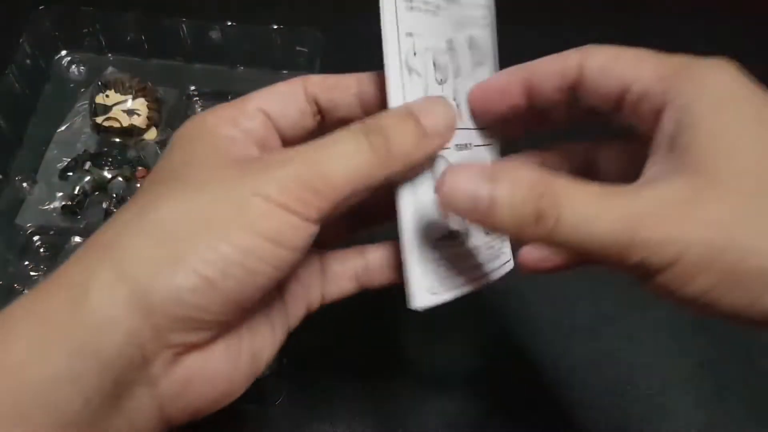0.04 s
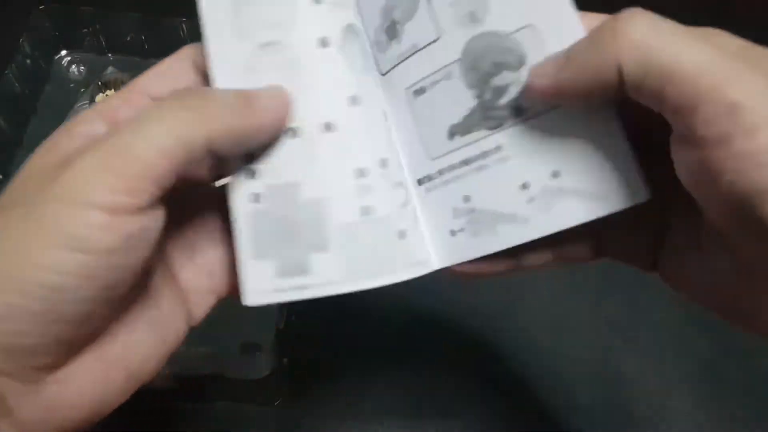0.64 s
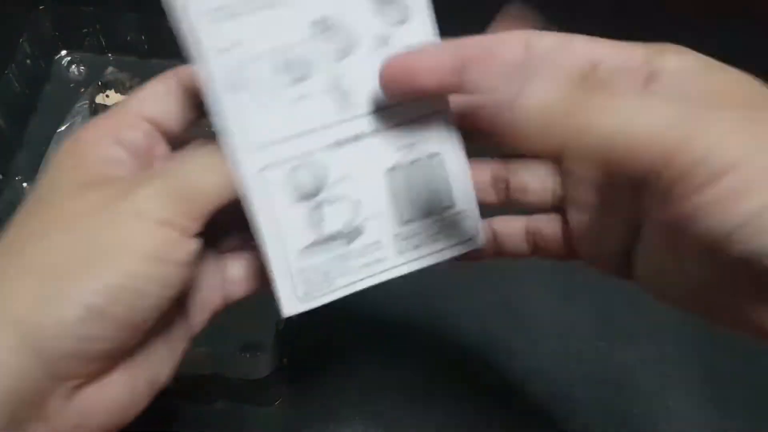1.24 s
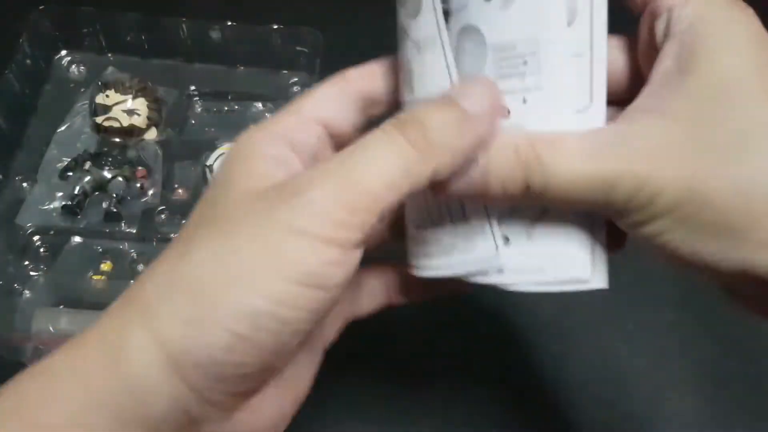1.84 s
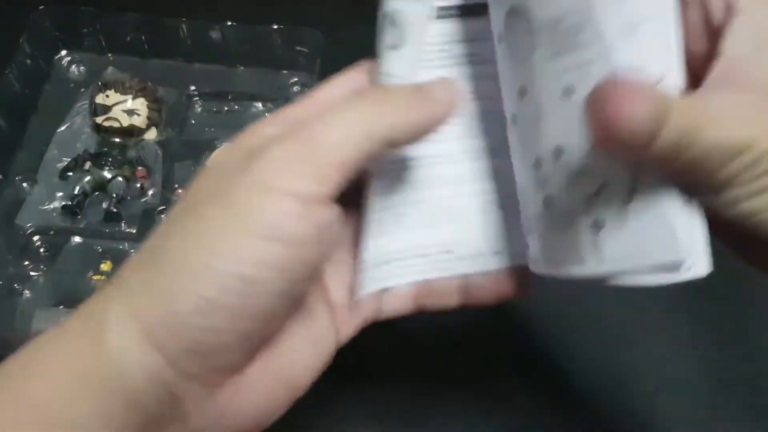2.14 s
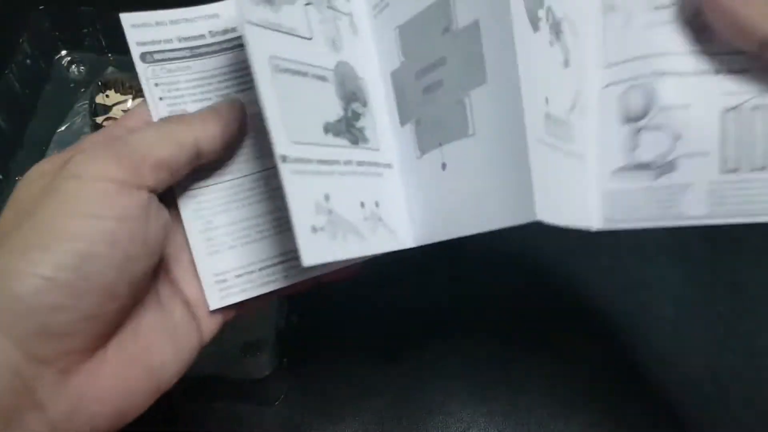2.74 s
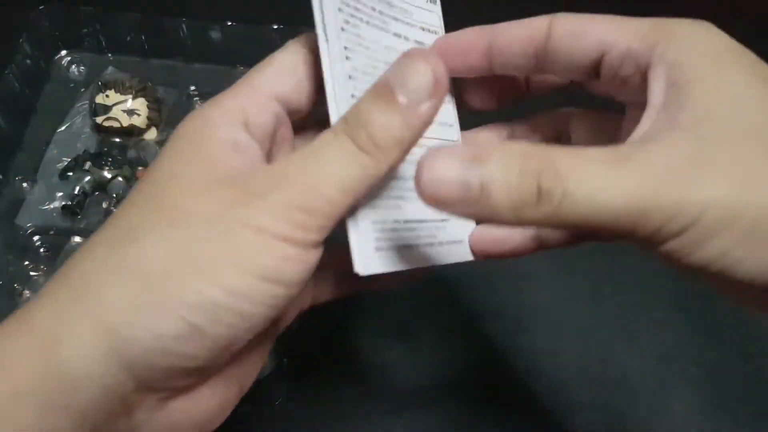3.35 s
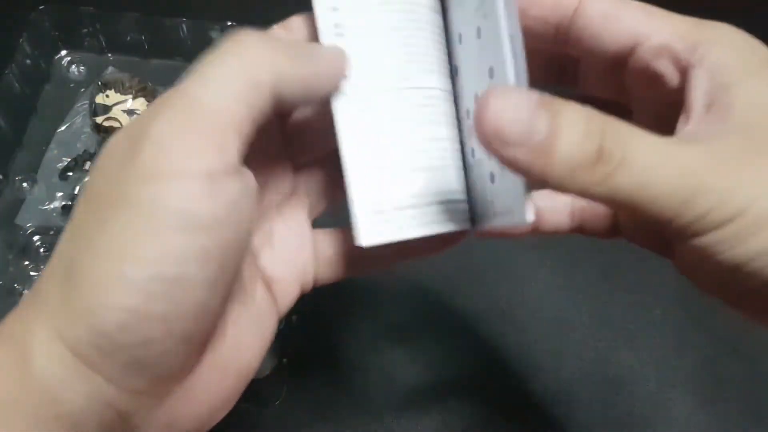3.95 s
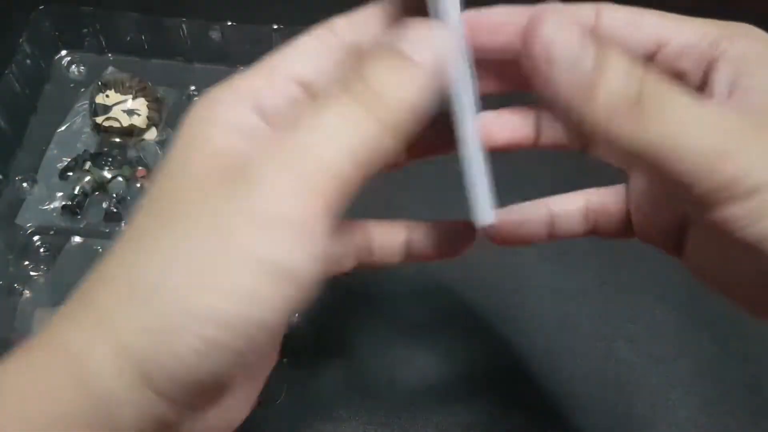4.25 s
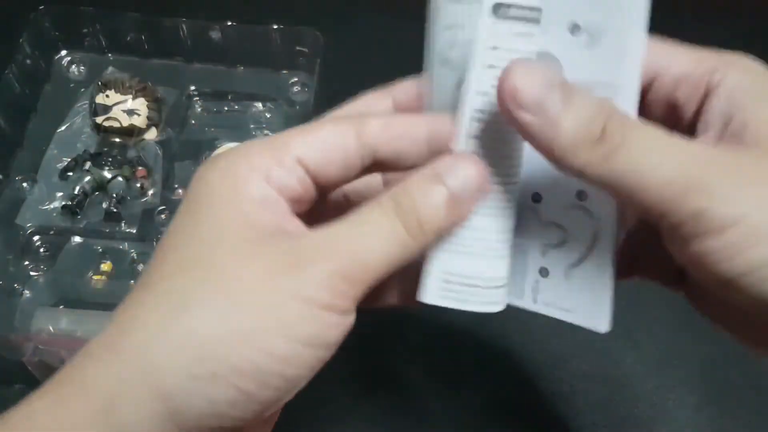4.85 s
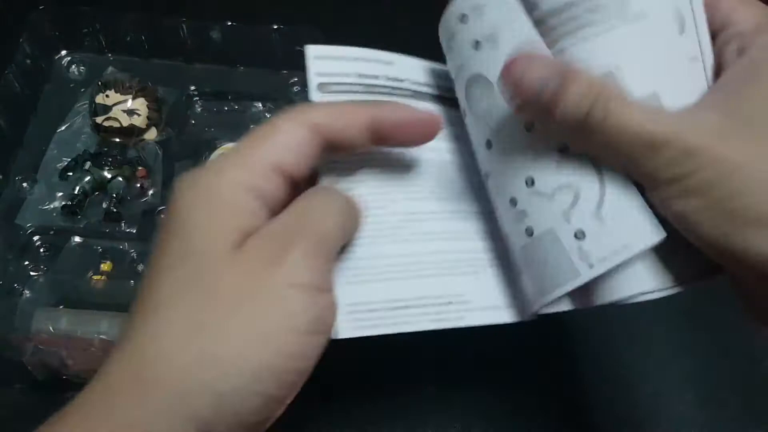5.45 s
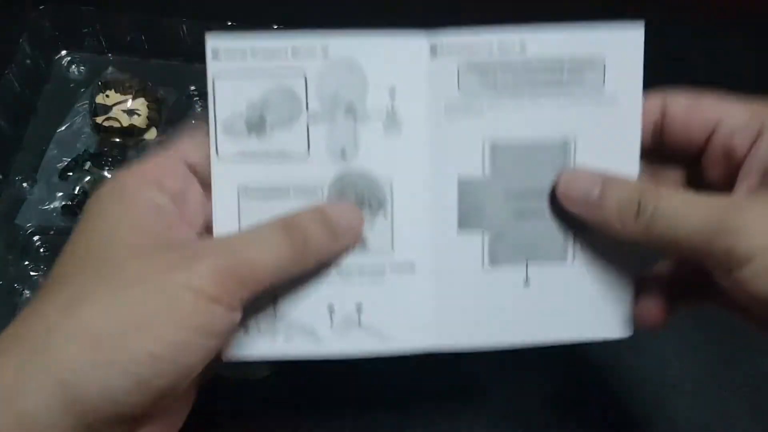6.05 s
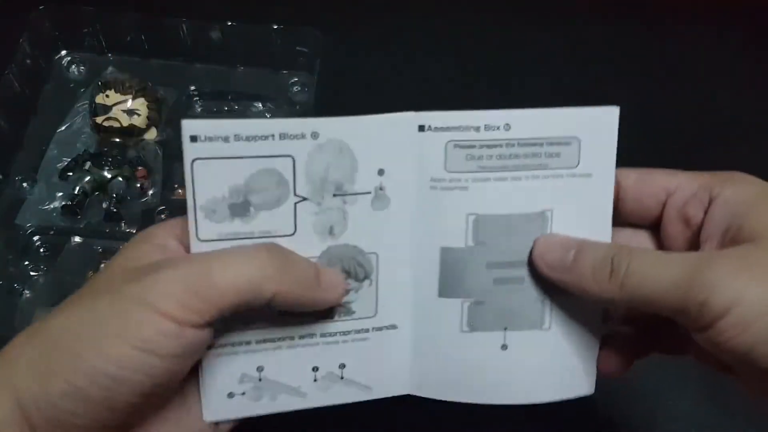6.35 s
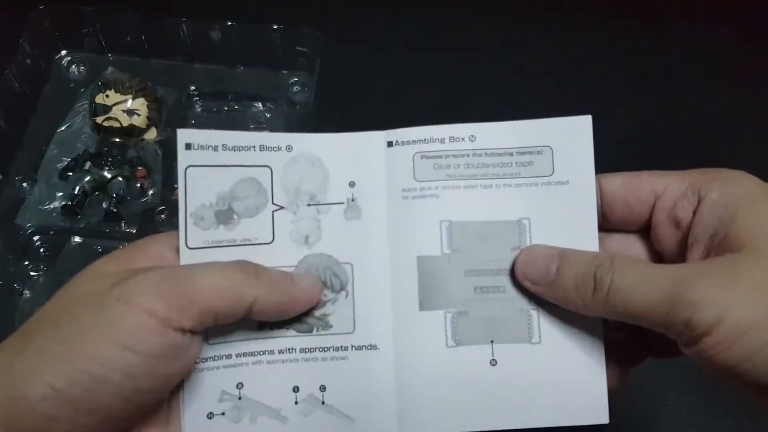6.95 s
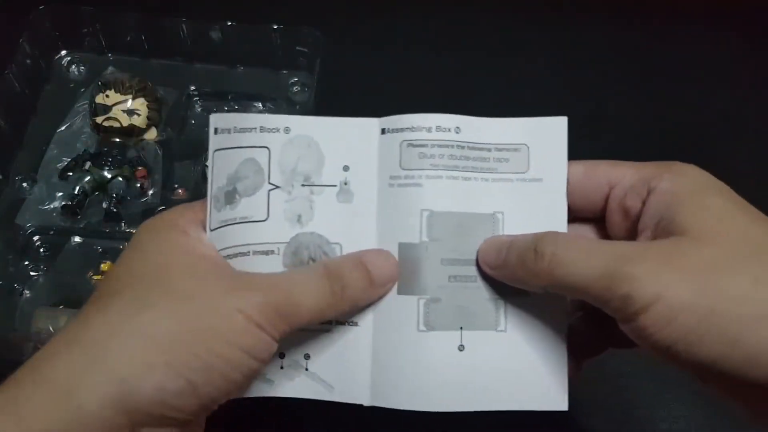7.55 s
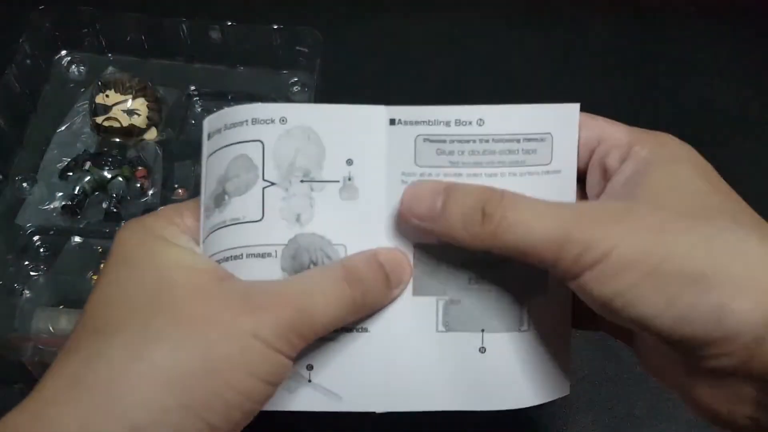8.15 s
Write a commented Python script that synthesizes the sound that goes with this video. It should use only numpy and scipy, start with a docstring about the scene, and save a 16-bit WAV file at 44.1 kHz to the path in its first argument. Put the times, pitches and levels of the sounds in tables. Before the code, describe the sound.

Two hands unfold, turn and refold a paper leaflet close to a stereo microphone in a small room. Soft sliding and small crease ticks grow into a louder rustle, and a panel buckles with a crisp crackle. After gentler handling, a second burst of rustling ends in another crackle, then fades to light rubs and taps. A low rumble, faint hum and distant engine lie underneath.

```python
"""Paper leaflet, close up in a small room

Two hands unfold, turn and refold a leaflet right in front of a stereo pair of microphones.
Leaves scrape and hiss over each other and under the fingers, creases tick as they snap over,
and twice a panel buckles with a loud crackle. Well behind the paper sit room rumble,
a faint mains hum, a low drone and a distant engine that slowly runs down."""
import sys
import numpy as np
from scipy import signal
from scipy.fft import rfft, irfft, next_fast_len
from scipy.io import wavfile
from scipy.ndimage import uniform_filter1d, map_coordinates

SR = 44100
rng = np.random.default_rng(int(sys.argv[2]) if len(sys.argv) > 2 else 0)


def to_wav(s):
    """Save 16-bit WAV."""
    ch = np.atleast_2d(s).T  # columns
    pcm = np.round(np.clip(ch, -1, 1) * 32767)  # PCM
    wavfile.write(sys.argv[1], SR, pcm.astype(np.int16))


N = 361179


def sliding(scrape_gain_db=1, hiss_gain_db=1.5, flutter_db=0.76, crinkle_db=-53.5, free_slide_db=-49):
    """Pressed paper scrapes and crinkles, gliding paper hisses; the grip flutters scrape and hiss."""
    # spectra of pressed and of gliding paper at the microphones: f/Hz, level/dB
    scrape_colour = [(150, -23.5), (400, -25), (700, -2), (1300, -6.5), (1800, 6.5), (2250, 10.5),
                     (2700, 6), (4200, 6), (6500, 5), (8500, -5.5), (12000, 0.5), (16000, -24)]
    hiss_colour = [(3000, -23.5), (7000, -5.5), (8700, -12.5), (11000, -3.5), (13000, -0.5), (15500, -0.5),
                   (17000, 1.5)]
    crinkle_colour = [(400, 1), (1200, 7), (2600, -2), (6000, -7), (8500, -14), (14000, -1.5)]
    scrape_db, hiss_db = hand_effort()
    grip_db = flutter_db * wobble(70)
    scrape = swirling(coloured(friction(rate=800, clump_db=2.7), scrape_colour), depth_db=4.2)
    hiss = swirling(coloured(friction(rate=2000, clump_db=-0.5), hiss_colour), depth_db=3.3)
    crinkle = coloured(crinkles(rate=70, spread_db=5, life=0.0005), crinkle_colour)
    # crinkles stop growing once the leaves slide freely, so they stand out in gentle handling
    effort_db = 0.97 * np.minimum(scrape_db - free_slide_db, 0)
    return (amp(scrape_db + scrape_gain_db + grip_db) * scrape
            + amp(hiss_db + hiss_gain_db + grip_db) * hiss
            + amp(crinkle_db + effort_db) * crinkle)


def hand_effort(rub_hiss_db=3.5):
    """Scrape and hiss levels in dB: single strokes on top of the soft rubbing of the hands."""
    # rubbing between strokes: t/s, level/dB
    rubbing = [(0, -79), (.5, -71.5), (1.1, -69), (1.32, -78), (1.6, -57), (2.5, -58.5), (3.1, -61),
               (3.3, -80), (4.0, -74), (4.8, -69.5), (5.0, -58.5), (5.07, -62.5), (5.7, -51), (6.25, -69.5),
               (6.75, -72.5), (7.35, -75.5), (7.55, -83), (7.8, -86), (8.0, -71.5), (8.19, -70)]
    # strokes of paper over paper or skin: t/s, length/s, scrape/dB, hiss/dB
    strokes = [(0.042, 0.073, -66.5, -55), (0.144, 0.1, -70, -60), (0.298, 0.018, -59.5, -51),
               (0.359, 0.024, -60, -59), (0.592, 0.12, -56, -67), (0.69, 0.055, -56.5, -51),
               (0.78, 0.032, -69, -53), (0.84, 0.09, -56.5, -51.5), (1.095, 0.081, -67, -57.5),
               (1.163, 0.048, -64, -47), (1.323, 0.094, -64, -59.5), (1.436, 0.12, -60.5, -52),
               (1.544, 0.054, -43.5, -34.5), (1.607, 0.056, -47.5, -47), (1.645, 0.019, -43, -38),
               (1.663, 0.056, -41.5, -32.5), (1.723, 0.071, -45.5, -42.5), (1.759, 0.11, -45.5, -38.5),
               (1.92, 0.17, -51.5, -67), (2.141, 0.039, -51.5, -51), (2.26, 0.067, -51.5, -59.5),
               (2.314, 0.027, -44, -37.5), (2.395, 0.076, -49, -58.5), (2.522, 0.12, -53.5, -51),
               (2.818, 0.066, -53.5, -53), (3.132, 0.058, -56.5, -50.5), (3.267, 0.075, -69.5, -61),
               (3.54, 0.077, -85, -58.5), (3.76, 0.071, -73, -58.5), (4.069, 0.073, -69.5, -55),
               (4.119, 0.042, -54.5, -48.5), (4.187, 0.036, -57.5, -49), (4.31, 0.18, -80, -60),
               (4.49, 0.026, -59.5, -53.5), (4.571, 0.034, -64.5, -53), (4.639, 0.073, -66, -53.5),
               (4.82, 0.051, -60, -49), (4.92, 0.03, -48, -43.5), (5.107, 0.079, -59.5, -49.5),
               (5.162, 0.089, -55, -43), (5.24, 0.06, -40.5, -29.5), (5.311, 0.064, -41, -32.5),
               (5.395, 0.23, -50, -46), (5.531, 0.1, -43, -42.5), (5.817, 0.043, -41, -35),
               (5.907, 0.14, -51.5, -43.5), (6.06, 0.076, -61, -47), (6.254, 0.083, -63.5, -54.5),
               (6.372, 0.091, -81, -55.5), (6.577, 0.04, -65, -51), (6.897, 0.07, -62, -61),
               (6.937, 0.065, -59.5, -53), (7.596, 0.042, -63, -57), (7.867, 0.08, -61, -76),
               (7.926, 0.06, -56.5, -57), (8.064, 0.055, -65, -80)]
    power = amp(curves(rubbing)[0] + np.array([[0], [rub_hiss_db]])) ** 2
    for start, length, *levels in strokes:
        add(power, start, np.outer(amp(levels), stroke(length)) ** 2)
    return 10 * np.log10(power)


def stroke(length, attack_s=0.018, release_db_per_s=262):
    """Gain of one stroke: it sets in quickly, holds, then dies away."""
    t = np.arange(SR // 2) / SR
    return np.minimum(t / attack_s, 1) * amp(-release_db_per_s * np.maximum(t - length, 0))


def friction(rate, clump_db):
    """Tiny slips arrive in brief clumps: mid and side noise."""
    return amp(clump_db * wobble(rate)) * rng.standard_normal((2, N))


def swirling(x, depth_db):
    """Random, shifting narrow-band patches give the scrape and hiss a swirling texture."""
    spectra = signal.stft(x, nperseg=1024)[2]
    patches = rng.standard_normal(spectra.shape[1:])
    for axis in (0, 1):  # smooth over frequency, then time
        patches = uniform_filter1d(patches, size=4, axis=axis)
    swirled = signal.istft(spectra * amp(depth_db * unit(patches)), nperseg=1024)[1]
    return unit(swirled[:, :N])


def crinkles(rate, spread_db, life):
    """Tiny cracks of random size in the bending sheet, about rate a second: mid and side."""
    cracks = (rng.random(N) < rate / SR) * amp(spread_db * np.minimum(rng.exponential(size=N), 2))
    envelope = signal.lfilter([1], [1, -np.exp(-1 / (life * SR))], cracks)
    return envelope * rng.standard_normal((2, N))


def buckling(strain_db=-15, crack_db=-15, shiver_db=-26):
    """A panel flips in a few dry jerks, its ring shifting; it strains before each and shivers after."""
    # jerks: t/s, push/dB, body/dB, crisp/dB, edge/dB (four bands, low to high), life/s, ring/Hz
    jerks = [(2.3851, -34, -35.5, -30.5, -30.5, 0.002, 1400), (2.39, -28, -28.5, -37, -38.5, 0.0019, 910),
             (2.3938, -36.5, -28, -29.5, -46, 0.0024, 1200), (2.4005, -37.5, -30, -34.5, -50, 0.0026, 1300),
             (2.4089, -43, -29.5, -45, -47.5, 0.004, 1150), (2.4216, -38, -34, -42, -51.5, 0.012, 1100),
             (5.6235, -24, -27.5, -37.5, -51, 0.0018, 1050), (5.6278, -50, -23, -41, -54, 0.0049, 1950),
             (5.635, -34, -37.5, -33.5, -51.5, 0.0023, 1800), (5.6471, -27.5, -32.5, -34, -40, 0.002, 900),
             (5.6516, -30, -25, -34.5, -45, 0.0008, 1210), (5.6542, -33, -23.5, -30.5, -42, 0.0022, 1800),
             (5.667, -45, -31.5, -40, -45, 0.0033, 1900), (5.679, -41.5, -39, -52, -56, .002, 900)]
    # dry crack of each jerk at the microphones: f/Hz, level/dB
    crack_colour = [(500, -5.5), (2000, 18), (6500, 4.5), (8700, -14.5), (10800, 13.5), (15000, 12)]
    # side signal of a panel close and straight ahead of the microphones: f/Hz, gain/dB
    near_side = [(200, 8), (400, -8.5), (1200, -5), (4000, 1.5)]
    out = np.zeros((2, N))
    for s, *levels, life, ring_hz in jerks:
        def response(hz):
            crack = amp(crack_db + along(crack_colour, hz))
            return (sheet(hz) + crack) * ringing(hz, ring_hz, db=2, q=2.8)

        def panel(drive):
            return voiced(filtered(drive, response), [200, 750, 3000, 8000, 16000], levels)

        strain = jerk(rise=0.0004, life=0.0025)[:, ::-1]  # reversed: swells into the jerk
        padded_strain = np.pad(strain, ((0, 0), (0, SR // 20)))
        add(out, s - strain.shape[1] / SR, amp(strain_db) * panel(padded_strain))
        snap = jerk(rise=0.0004, life=life)
        shiver = amp(shiver_db) * jerk(rise=0.002, life=0.014)
        add(out, s, panel(snap + shiver))
    return np.array([out[0], equalised(out[1], near_side)])


def creases(gain_db=0.5):
    """A crease snaps over within milliseconds and rings the paper beside it."""
    # ticks of creases and edges: t/s, level/dB, treble tilt/dB, ring/Hz, life/s
    ticks = [(0.0442, -59.5, 4, 870, 0.0015), (0.1636, -51.5, 4.5, 5200, 0.0017),
             (0.6052, -47.5, 1.5, 5050, 0.0015), (0.8577, -47, 6.5, 4400, 0.00057),
             (1.3404, -50.5, 3, 950, 0.0011), (1.479, -57.5, -3, 1210, 0.0022),
             (1.778, -34.5, -0.5, 2170, .0026), (1.7852, -36.5, 3.5, 1070, 0.0015),
             (2.0299, -54, -4.5, 2280, .003), (2.1636, -53, -2, 2120, .0026),
             (2.568, -50.5, -7.5, 1090, .0018), (2.83, -41, 0, 6900, 0.0011),
             (3.167, -57, -10, 1300, 0.0065), (4.159, -54.5, -3, 2200, 0.0036),
             (4.833, -58, 6, 4140, .0015), (4.945, -50, 1, 4020, .0028), (5.595, -47, -5, 2200, .002),
             (6.3486, -49, -3, 1220, 0.00085), (6.917, -51, 4.5, 1060, 0.0018),
             (6.9558, -42, 3, 5860, 0.0024), (7.602, -55.5, 6, 5000, 0.0042)]
    # microphone notch near 9 kHz, heard on the ticks: f/Hz, gain/dB
    mic_notch = [(7000, 0), (8700, -6), (11000, -5), (14000, -1)]
    out = np.zeros((2, N))
    for s, db, tilt, ring_hz, life in ticks:
        snap = jerk(life / 4, life)
        rung = filtered(snap, lambda hz: ringing(hz, ring_hz, db=13, q=12))
        crack = voiced(rung, [600, 3000, 8500, 16000], [db - tilt, db, db + tilt])
        add(out, s, equalised(crack, mic_notch))
    return amp(gain_db) * out


def dragging(width_hz=330):
    """A dragged edge sticks and slips hundreds of times a second, each slip ringing the free sheet."""
    # rasps of an edge: t/s, length/s, level/dB, ring/Hz
    drags = [(1.628, 0.06, -45.5, 2350), (5.324, 0.15, -50, 2140), (5.531, 0.07, -53, 2280)]
    out = np.zeros((2, N))
    for start, length, db, ring_hz in drags:
        pressure = amp(db) * stroke(length)
        slips = crinkles(rate=900, spread_db=3, life=0.00003)[:, :len(pressure)]
        rasp = filtered(slips, lambda hz: resonance(hz, ring_hz, width_hz) ** 2)
        add(out, start, pressure * unit(rasp))
    return out


def flaps(thud_db=4.5, thud_hz=270, thud_width_hz=220):
    """Softer contacts reach only the sheet's lower resonances; the fingers add a broad, dull thud."""
    # soft flaps and finger taps: t/s, level/dB, upper edge/Hz, life/s
    contacts = [(1.344, -44.5, 1210, 0.003), (1.724, -44.5, 600, .004), (2.5689, -39.5, 900, 0.00083),
                (2.571, -35, 500, 0.0054), (2.603, -40, 1400, 0.0065), (2.613, -37.5, 563, .014),
                (2.644, -42, 905, 0.02), (3.18, -42, 900, 0.019), (5.419, -34.5, 2020, 0.01),
                (6.121, -44, 1960, 0.002), (6.92, -40.5, 1300, 0.0014), (6.957, -44, 920, 0.0025),
                (7.323, -42, 900, 0.0017), (7.6005, -49.5, 1210, .001), (7.921, -39, 700, 0.0024)]
    out = np.zeros((2, N))
    for s, db, top_hz, life in contacts:
        paper = filtered(jerk(life / 2, life), sheet)
        thud = filtered(jerk(life / 2, life), lambda hz: resonance(hz, thud_hz, thud_width_hz))
        add(out, s, voiced(paper + amp(thud_db) * thud, [160, top_hz], [db]))
    return out


def jerk(rise, life):
    """A short mid and side burst of slipping fibres; rise and life in seconds."""
    t = np.arange(SR // 12) / SR
    return rng.standard_normal((2, len(t))) * (1 - np.exp(-t / rise)) * np.exp(-t / life)


def sheet(hz):
    """Response of the held sheet, a sum of broad resonances."""
    # paper resonances: f/Hz, width/Hz, level/dB
    modes = [(286, 150, 3), (373, 51, 6), (441, 54, 0), (884, 110, -2.5), (1144, 170, 0), (1400, 120, 0.5),
             (1800, 490, -3.5), (2200, 220, -2.5), (2500, 140, -8), (2940, 340, -6), (3600, 2000, -15.5)]
    return sum(amp(db) * resonance(hz, centre, width) for centre, width, db in modes)


def air_puffs():
    """A swinging panel fans a low puff of air at the microphones."""
    # swings: t/s, level/dB, half length/s
    swings = [(1.494, -45.5, 0.061), (2.403, -36, 0.025), (2.587, -44.5, 0.058), (5.644, -39.5, 0.042)]
    puff_colour = [(25, -21), (50, -2.5), (88, 2), (125, -3.5), (200, -11.5), (400, -11), (2000, -77.5)]
    t = np.arange(N) / SR
    envelope = sum(amp(db) * np.exp(-((t - s) / half) ** 2) for s, db, half in swings)
    return envelope * noise(puff_colour)


def room(x, wet_db, delay_s=0.005):
    """The near walls answer the mid signal with a diffuse tail, the treble dying first."""
    # room decay: f/Hz, t60/s
    decay = [(100, 0.33), (500, 0.34), (2500, 0.38), (7000, 0.25), (15000, 0.1)]
    hz, t, spectra = signal.stft(rng.standard_normal((2, SR // 2)), SR, nperseg=256)
    fade = amp(-60 * t / along(decay, hz)[:, None])
    tail = signal.istft(spectra * fade, SR, nperseg=256)[1]
    tail = np.pad(tail / np.linalg.norm(tail[0]), ((0, 0), (round(delay_s * SR), 0)))
    return x + amp(wet_db) * signal.fftconvolve(x[:1], tail, axes=1)[:, :N]


def distant_engine(fast_hz=49.1, slow_hz=25.3, midpoint_s=5.83, slowing_s=2.25, throb_db=1.2):
    """Low orders of a far engine throb and sink as its shaft slows along an S-curve."""
    # engine's rise and fall: t/s, level/dB
    swell = [(0, -73), (3.25, -69), (3.45, -49.5), (3.95, -52), (4.25, -49.5), (5.5, -49.5), (6.0, -51),
             (6.25, -56), (7.3, -54), (8.19, -75)]
    # engine orders: multiple of shaft speed, level/dB
    orders = [(2, -10.5), (3, -3.5), (4, 0), (5, -9)]
    # standing waves of the room favour some pitches: f/Hz, gain/dB
    boom = [(65, -15), (78, 4), (92, 4), (112, -22), (133, 0.5), (150, -0.5), (168, 5), (200, -7), (260, 8)]
    slowed = (1 + np.tanh((np.arange(N) / SR - midpoint_s) / slowing_s)) / 2
    shaft_hz = fast_hz + (slow_hz - fast_hz) * slowed
    swell_db = curves(swell)[0]
    engine = sum(tone(k * shaft_hz, swell_db + db + along(boom, k * shaft_hz)) for k, db in orders)
    return amp(throb_db * wobble(23)) * engine


def hum_and_drone(waver_db=2.5):
    """Faint mains hum and a low drone that comes and goes, both slightly unsteady; at first the line carries
    the far engine's third order near 150 Hz."""
    # mains partials: f/Hz, level/dB
    mains = [(100, -60), (300, -59.5)]
    # course of the drone, which opens on the far engine's third order near 150 Hz: t/s, f/Hz, level/dB
    drone = [(0, 148.5, -51), (.3, 155, -53.5), (.6, 131.6, -81), (1.9, 128.9, -57.5), (2.6, 135, -51.5),
             (3.2, 131.7, -54), (4.3, 131, -76), (4.8, 130, -77)]
    return sum(tone(hz, db + waver_db * wobble(6)) for hz, db in [*mains, curves(drone)])


def room_tone(rumble_db=-49.5):
    """Steady room rumble and a soft rush that swells and fades in the background."""
    # spectra of the rumble and the rush: f/Hz, level/dB
    rumble_colour = [(20, -23), (35, -5), (48, 0.5), (90, 7), (115, 1.5), (160, 5), (250, 0.5), (440, -5.5),
                     (560, -10), (700, -10.5), (900, -8.5), (1700, -15.5), (3000, -33), (8000, -87)]
    rush_colour = [(200, -23), (350, -0.5), (470, 5), (650, -20), (2000, -47.5)]
    # course of the rush: t/s, level/dB
    rush = [(0, -54), (.4, -55), (.6, -59.5), (4.2, -61), (4.4, -54.5), (4.75, -56.5), (5.0, -63),
            (8.19, -59.5)]
    return amp(rumble_db) * noise(rumble_colour) + amp(curves(rush)[0]) * noise(rush_colour)


def microphones(x):
    """Mid and side to a stereo pair: alike in the bass, the left one open to more treble."""
    # stereo width: f/Hz, side gain/dB
    width = [(30, -7.5), (60, -16), (130, -15), (300, -13.5), (640, -3), (1400, 0), (3000, -2), (6000, 0)]
    # balance of the pair: f/Hz, left minus right/dB
    lean = [(200, 0.5), (600, 0.79), (2000, 1.6), (4400, 0.2), (8000, 4.2), (11000, 3.5), (14500, 10.4)]

    def balance(hz):
        angle = np.arctan(amp(along(lean, hz)))
        return np.sqrt(2) * np.array([np.sin(angle), np.cos(angle)])

    mid, side = x[0], equalised(x[1], width)
    return filtered(np.array([mid + side, mid - side]), balance)


def amp(db):
    """Decibels to gain."""
    return 10 ** (np.asarray(db) / 20)


def unit(x):
    """Scale to rms 1."""
    return x / np.sqrt(np.mean(x ** 2) + 1e-20)


def along(points, hz):
    """Read (f/Hz, value) points on a log frequency axis."""
    freqs, values = np.transpose(points)
    return np.interp(np.log(hz + 1), np.log(freqs + 1), values)


def curves(rows):
    """One value per sample for each column after the time."""
    times, *columns = np.transpose(rows)
    return [np.interp(np.arange(N) / SR, times, column) for column in columns]


def wobble(rate):
    """A smooth random curve, rate knots a second."""
    return map_coordinates(rng.standard_normal(int(N * rate / SR) + 4), [np.arange(N) * rate / SR])


def tone(hz, db):
    """A sine at an rms level, its phase wandering slightly."""
    phase = 2 * np.pi * np.cumsum(hz * np.ones(N)) / SR + 0.25 * wobble(5)
    return np.sqrt(2) * amp(db) * np.sin(phase)


def filtered(x, response):
    """Pass x through a response, given as a function of frequency."""
    n = x.shape[-1]
    size = next_fast_len(n + 8192)
    return irfft(rfft(x, size) * response(np.fft.rfftfreq(size, 1 / SR)), size)[..., :n]


def equalised(x, spectrum):
    """Shape x by (f/Hz, gain/dB) points."""
    return filtered(x, lambda hz: amp(along(spectrum, hz)))


def coloured(x, spectrum):
    """Shape x by a spectrum and scale to rms 1."""
    return unit(equalised(x, spectrum))


def noise(spectrum):
    """Coloured mid and side noise at rms 1."""
    return coloured(rng.standard_normal((2, N)), spectrum)


def voiced(burst, edges_hz, levels_db):
    """Give each band of a burst its level, counted over 10 ms."""
    out = 0
    for low, high, db in zip(edges_hz, edges_hz[1:], levels_db):
        band = signal.sosfilt(signal.butter(3, [low, high], "band", fs=SR, output="sos"), burst)
        out = out + amp(db) * band * np.sqrt(SR / 100) / np.linalg.norm(band, axis=1, keepdims=True)
    return out


def resonance(hz, centre_hz, width_hz):
    """Causal response of one resonance, 1 at its centre."""
    return 1j * hz * width_hz / (centre_hz ** 2 - hz ** 2 + 1j * hz * width_hz)


def ringing(hz, ring_hz, db, q):
    """A flat response plus one resonance of the paper."""
    return 1 + amp(db) * resonance(hz, ring_hz, ring_hz / q)


def add(track, s, sound):
    """Mix a sound into the track at time s."""
    part = track[:, max(round(s * SR), 0):][:, :sound.shape[1]]
    part += sound[:, :part.shape[1]]


def scene():
    """The leaflet close to the microphones, the room and the far engine behind it."""
    rustle = room(sliding() + dragging() + creases(), wet_db=-13)
    crackle = room(buckling() + flaps(), wet_db=-12)
    background = room_tone()
    background[0] += hum_and_drone() + distant_engine()  # mid only
    return microphones(rustle + crackle + air_puffs() + background)


def record(dry):
    """The recorder keeps nothing above its band limit."""
    top_hz = 15740
    return filtered(dry, lambda hz: 1 / (1 + (hz / top_hz) ** 400))


dry = scene()
out = record(dry)
to_wav(out)
```